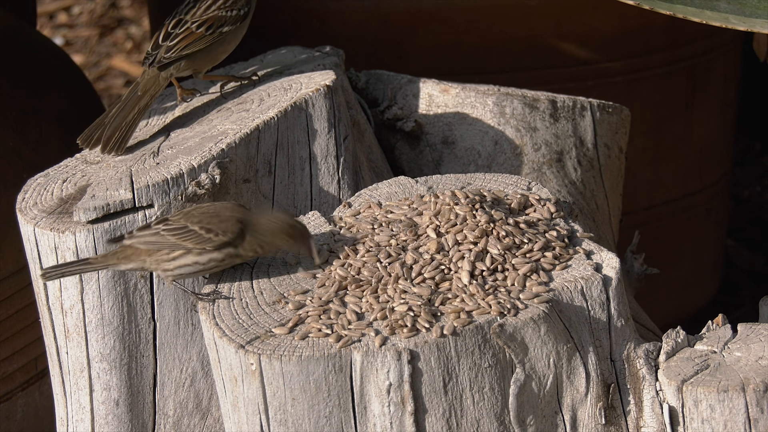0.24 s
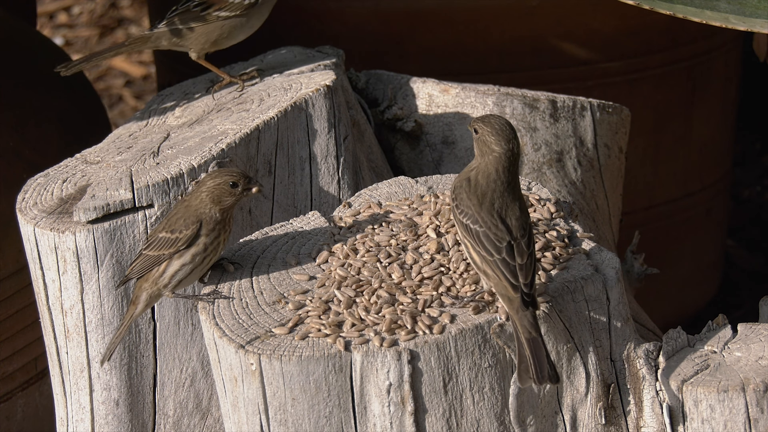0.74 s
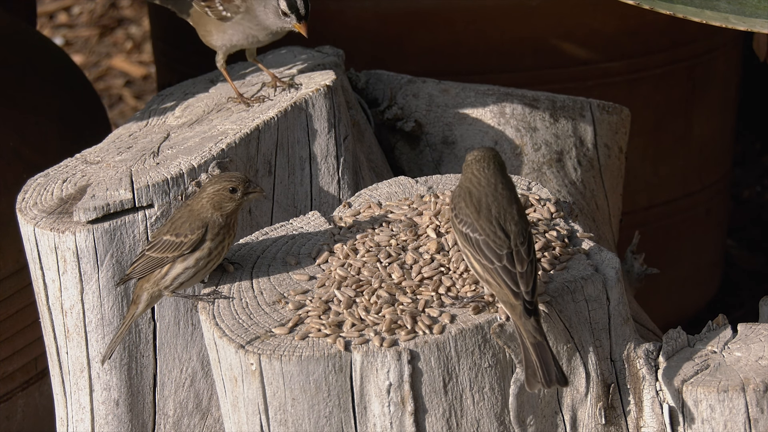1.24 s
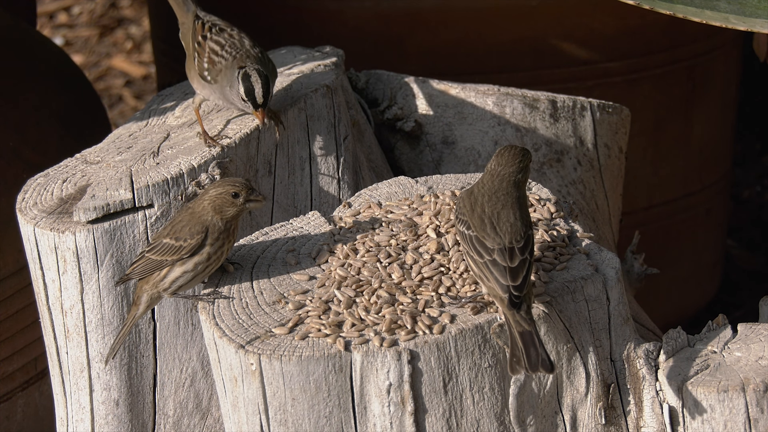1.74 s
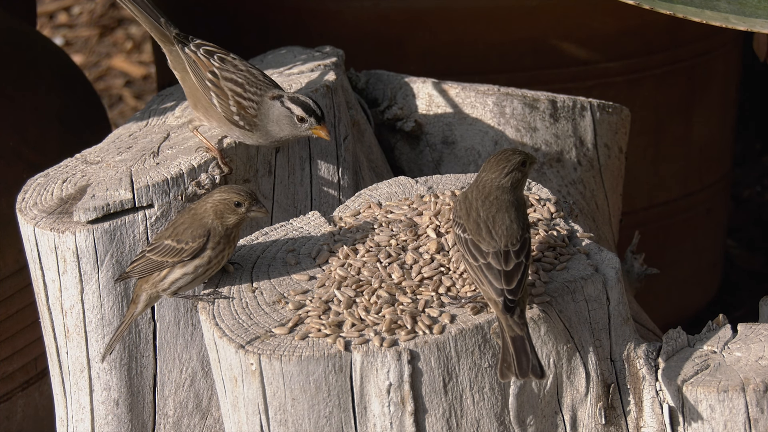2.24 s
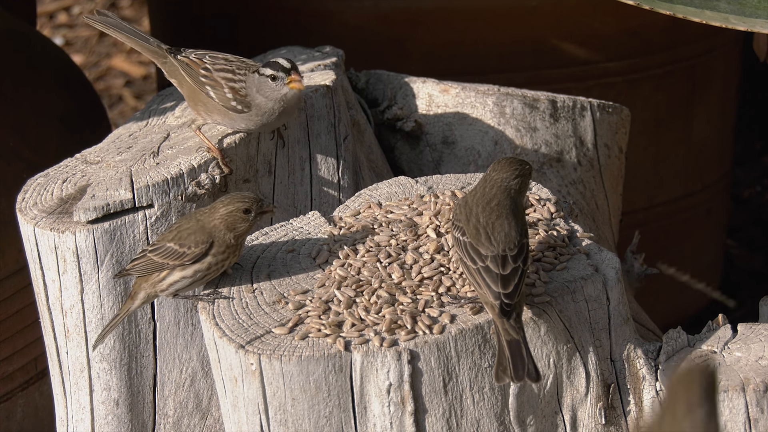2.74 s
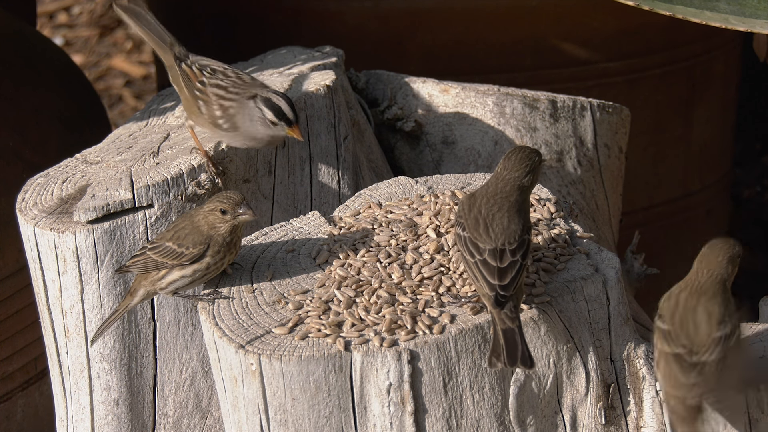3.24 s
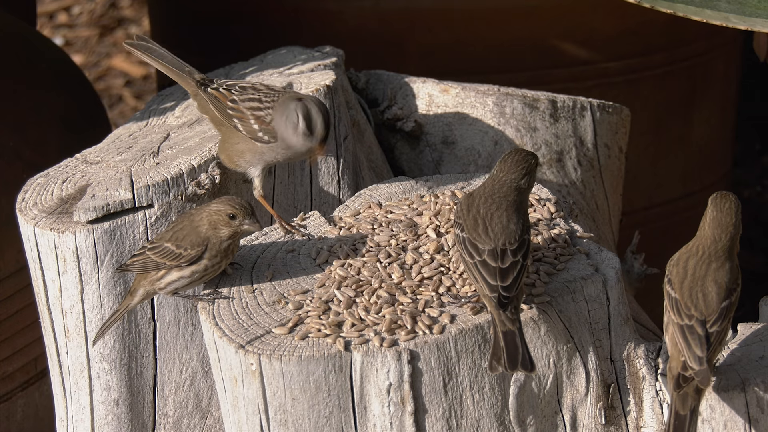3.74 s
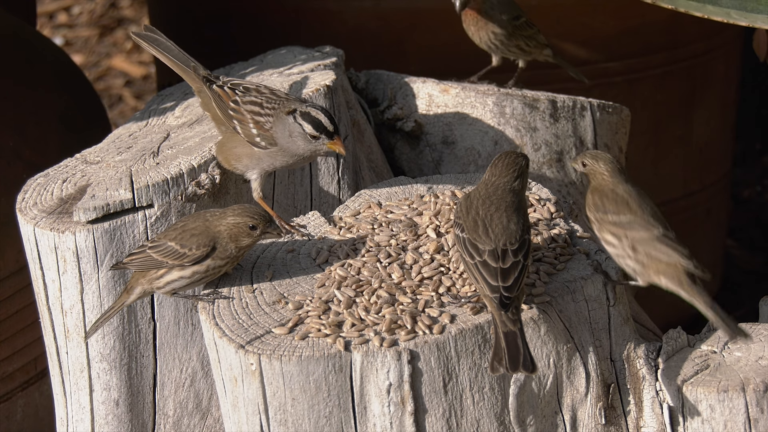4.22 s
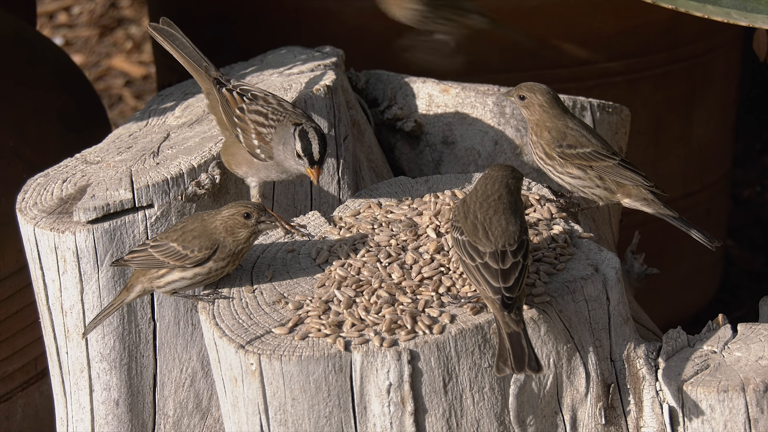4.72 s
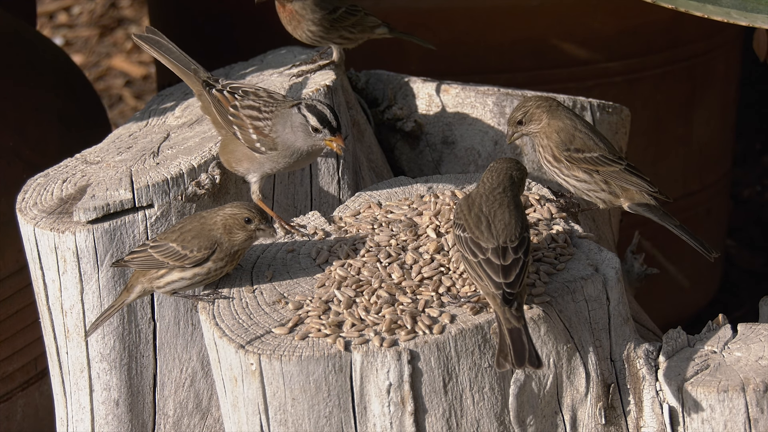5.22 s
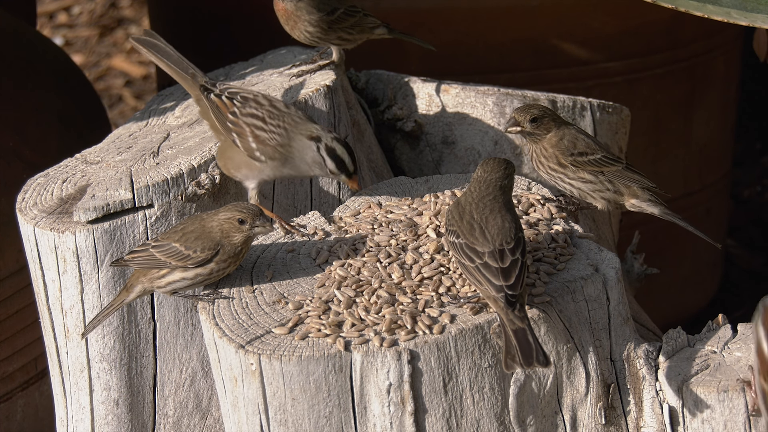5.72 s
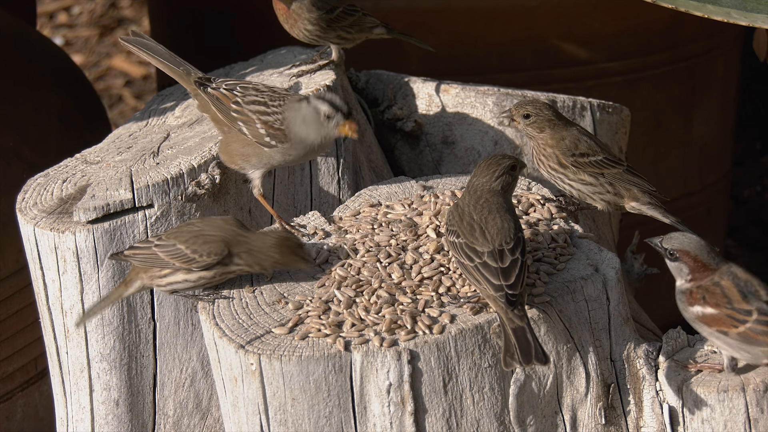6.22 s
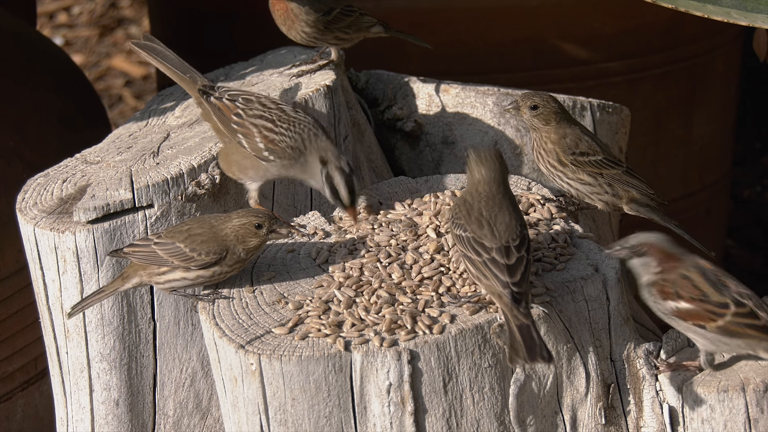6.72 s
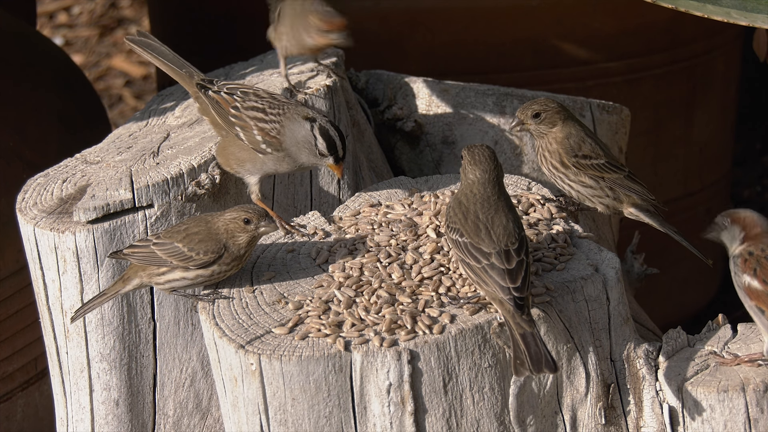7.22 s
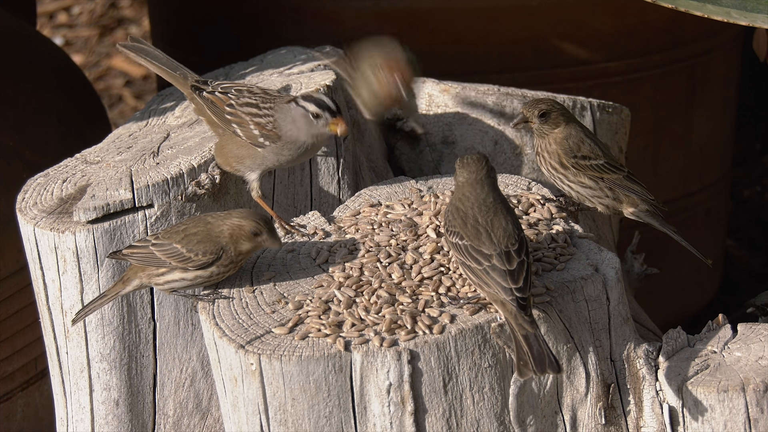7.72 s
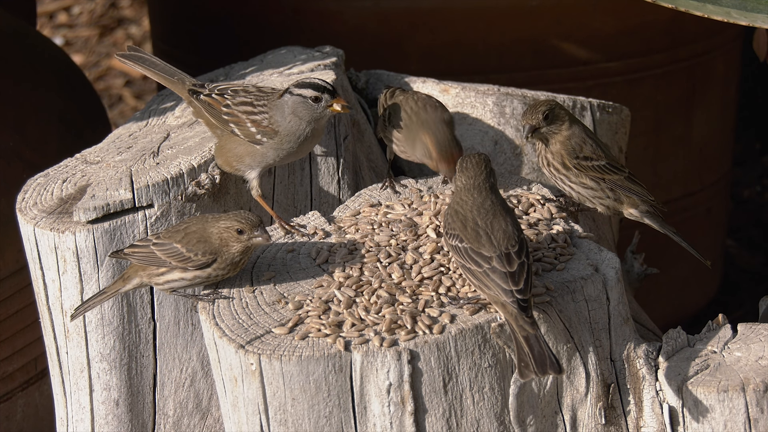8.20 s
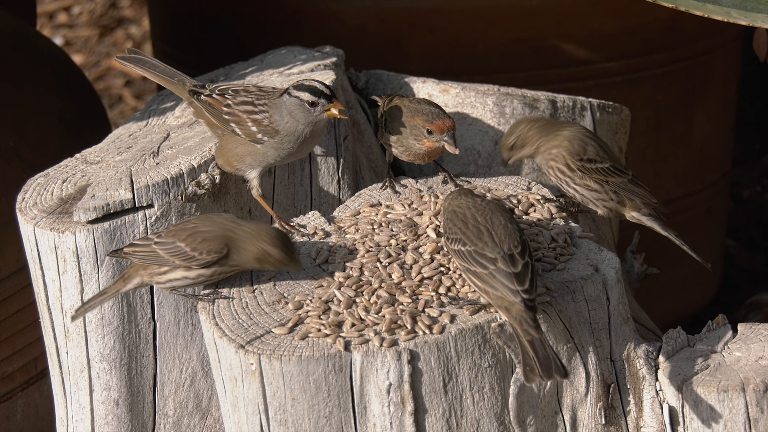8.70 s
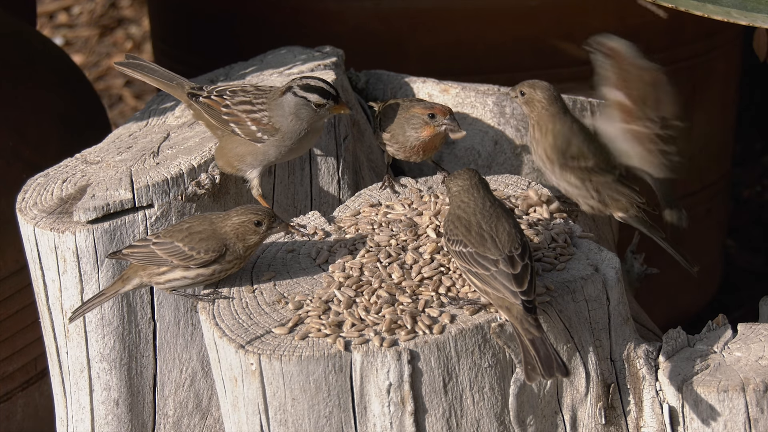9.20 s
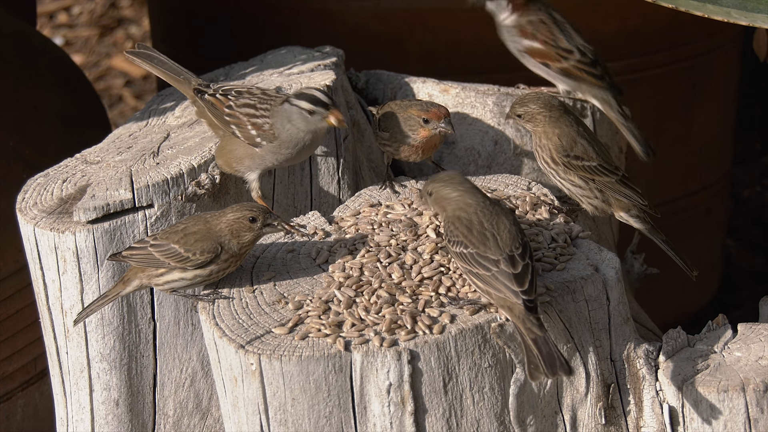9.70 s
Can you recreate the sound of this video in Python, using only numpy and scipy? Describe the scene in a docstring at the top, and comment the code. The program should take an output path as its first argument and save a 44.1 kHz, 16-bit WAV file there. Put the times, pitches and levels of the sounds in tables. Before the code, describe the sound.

In a quiet yard, small birds peck at seed close by, making crisp, uneven ticks and a soft rustle of husks. A quick run of clicks and bright chirps comes first, followed by several brief wing flutters. The calls thin out in the middle and grow busier toward the end, mixing near and far chirps, nasal cheeps and a thin high note. A distant flock is barely audible.

```python
"""Finches and sparrows feed on a heap of seed on a tree stump, close by, in a quiet yard.
Beaks and claws click on husks and wood, feet stir the seed, wings brush feathers and push air.
Two-voiced syrinx chirps, thin held notes and nasal cheeps, some breathy, come from near and far.
A wall throws them back; still air and a distant flock lie underneath."""
import sys
import numpy as np
from scipy import signal
from scipy.fft import rfft, irfft, next_fast_len
from scipy.io import wavfile
from scipy.ndimage import map_coordinates

SR = 44100
rng = np.random.default_rng(int(sys.argv[2]) if len(sys.argv) > 2 else 0)


def output_pcm(signal):
    """Save a mono or channel-first signal as 16-bit PCM at the path in sys.argv[1].

    Samples are clipped to [-1, 1] before scaling.
    """
    pcm = np.clip(np.atleast_2d(signal).T, -1, 1) * 32767
    wavfile.write(sys.argv[1], SR, np.round(pcm).astype(np.int16))


N = 438794
TIME_S = np.arange(N) / SR

# still air: f/Hz, level/dB
AIR_SPECTRUM = [(30, -34.5), (250, -36.5), (400, -28.5), (600, -18.5), (900, -9), (1400, -4.5), (2300, -5),
                (3200, -11.5), (5000, -11), (7000, -14.5), (11000, -11), (16000, -13.5)]
# distant flock: t/s, level/dB
FLOCK_LEVELS = [(0, -65.5), (.3, -70), (.45, -90.5), (1.2, -78.5), (3.4, -87.5), (3.7, -83.5), (5.1, -96),
                (6.6, -78.5), (8, -74), (9.95, -72.5)]
# distant flock: f/Hz, level/dB
FLOCK_SPECTRUM = [(500, -78.5), (2600, -31), (3300, 3.5), (3750, -9.5), (4250, 0.5), (4900, -26),
                  (6800, -22), (8200, -9), (9500, -23.5)]
# feet in loose seed: t/s, length/s, level/dB
SEED_SHUFFLES = [(0.257, 0.074, -64.5), (0.432, .15, -64), (.88, 0.13, -58), (1.123, 0.26, -76),
                 (1.54, 0.13, -67), (1.738, .08, -64.5), (2.032, 0.28, -73), (2.369, 0.15, -68),
                 (2.585, 0.42, -66.5), (3.076, 0.28, -63), (3.421, .11, -64), (3.882, 0.061, -63),
                 (4.221, 0.19, -70.5), (5.035, 0.044, -71), (5.175, .1, -69), (5.584, .1, -59.5),
                 (5.86, 0.22, -63.5), (6.258, .06, -69.5), (6.518, .23, -68.5), (6.952, 0.077, -74),
                 (7.454, 0.26, -76), (7.974, 0.058, -76), (8.544, 0.047, -58), (8.679, 0.24, -73),
                 (9.47, 0.11, -52.5), (9.71, 0.32, -72)]
# rubbing husks: f/Hz, level/dB
HUSK_SPECTRUM = [(200, -67), (1500, -21.5), (3000, -11), (5000, 0), (8000, 4.5), (10500, -5), (13000, -6),
                 (16000, -13)]
# short hissy bursts: wing flutters, and the breathy rasp around three cheeps (1.598, 3.308, 9.108 s):
# peak t/s, half length/s, hiss level/dB, puff level/dB
HISS_BURSTS = [(0.497, 0.043, -54.5, -75.5), (1.598, 0.046, -49, -87), (2.143, 0.042, -51.5, -76),
               (2.427, 0.06, -58.5, -76.5), (2.711, 0.07, -39, -55), (2.982, 0.041, -45.5, -63.5),
               (3.15, 0.06, -47.5, -63.5), (3.308, 0.024, -44.5, -84), (5.251, 0.044, -54, -64.5),
               (5.437, 0.031, -49, -67), (5.499, 0.025, -42, -52), (5.619, 0.039, -54.5, -71),
               (8.193, 0.048, -57.5, -70), (9.108, 0.046, -41.5, -76)]
# hiss of feathers or breathy rasp: f/Hz, level/dB
HISS_SPECTRUM = [(150, -74), (900, -34.5), (1700, -30.5), (3200, 3), (5000, 4), (8200, 5.5), (10500, -0.5),
                 (16000, -15.5)]
# puff of air under the hiss: f/Hz, level/dB
PUFF_SPECTRUM = [(160, -41), (280, -22.5), (400, -24.5), (560, -10.5), (800, -9), (1200, -4), (1750, 9),
                 (2600, 8.5), (5000, -16.5)]
# beak and claw clicks: t/s, level/dB, centre f/Hz, decay scale/s, relative crackle level/dB
PECK_CLICKS = [(.497, -44.5, 7300, 0.0063, -3), (0.5573, -42.5, 7100, 0.013, -9),
               (0.7702, -21, 4250, .0041, -23.5), (.7958, -30, 6000, 0.0033, -20),
               (.82, -25.5, 4660, 0.0021, -22), (.8307, -28.5, 5200, 0.001, -25),
               (.8637, -39, 5600, .0014, -27), (.8741, -24, 5320, 0.0014, -32),
               (0.9074, -26.5, 7700, 0.0023, -8), (.921, -35, 5900, 0.000486, -10.5),
               (0.9527, -32.5, 6570, 0.0012, -14.5), (1.5518, -42, 5800, .0006, -25),
               (1.5639, -36, 5700, 0.007, -3), (1.58, -40.5, 7600, 0.0067, -6),
               (1.595, -44, 7800, 0.0035, 3), (1.6525, -39, 7260, 0.0027, -14),
               (1.7708, -49, 7970, 0.0074, -17), (2.1151, -36, 7000, .0022, -5),
               (2.1313, -42, 5030, .0055, -8), (2.1635, -37.5, 6200, 0.0022, -3.5),
               (2.3952, -50, 6500, .0038, -10), (2.5852, -45, 7700, 0.0058, -10),
               (2.6258, -41, 6700, .0026, -22), (2.713, -39, 6600, .0015, -24),
               (2.7923, -39, 7400, 0.0054, -12), (3.133, -41, 5340, 0.0082, -20),
               (3.4293, -46.5, 7430, 0.0062, -29), (3.4906, -43.5, 7030, 0.004, -18),
               (3.61, -31, 5800, 0.0012, -10), (3.6476, -35, 6100, 0.0028, -16),
               (3.906, -47.5, 10100, .001, 1), (3.9192, -50, 9350, 0.0056, 2),
               (4.2122, -37, 8130, .0022, -3), (4.2135, -44, 3920, 0.0051, -13),
               (4.289, -42, 9310, 0.0013, -8), (4.4181, -36, 11100, 0.00064, -4),
               (4.461, -38.5, 7600, 0.0035, -4.5), (4.4483, -41.5, 7860, 0.00078, -8),
               (4.5725, -56.5, 6000, 0.0043, -21), (5.1707, -30.5, 6570, 0.00081, -12),
               (5.4328, -40.5, 6500, 0.0032, -4), (5.7062, -48, 8850, 0.0055, -5),
               (5.9509, -53.5, 6400, 0.0051, -27), (6.255, -31, 6530, 0.00043, -21),
               (6.2584, -32.5, 6180, 0.001, -14), (6.544, -45, 4960, 0.011, -11),
               (6.721, -51.5, 6230, 0.011, -11), (6.9601, -38, 5450, 0.0092, -12),
               (6.972, -33.5, 6230, 0.00023, -32), (7.0117, -48, 6200, 0.014, -10),
               (7.1864, -36.5, 7630, 0.00072, -22), (7.5844, -50.5, 10400, 0.0039, 0),
               (7.634, -39.5, 5370, 0.0033, -18), (7.6886, -29.5, 7900, 0.0046, -11.5),
               (7.688, -39.5, 7700, .0008, -18), (7.704, -37, 6860, 0.00043, -6),
               (7.8502, -33.5, 6330, 0.0011, -37), (8.264, -40, 9360, 0.0044, -4),
               (8.632, -52, 6570, .012, 4.5), (8.9554, -44, 6360, 0.0022, -9),
               (9.0585, -36, 7600, 0.00014, -37), (9.0716, -33.5, 6000, 0.00033, -28),
               (9.1815, -39.5, 5050, 0.0013, -17), (9.2719, -38.5, 8200, 0.0002, -20),
               (9.294, -42.5, 7900, 0.001, -22), (9.3436, -33.5, 8430, 0.00022, -13),
               (9.354, -41.5, 5700, 0.0058, 2), (9.5378, -38.5, 9200, 0.015, -10),
               (9.835, -40, 5620, 0.0018, -12), (9.9055, -52.5, 7320, 0.0049, 0)]
# finch chirps on a pitch arch; with crest delay <= 0 they only fall:
# t/s, length/s, crest f/Hz, crest delay/s, relative second voice level/dB, level/dB
FINCH_CHIRPS = [(.515, 0.014, 3650, .014, -16, -50), (.777, .058, 3830, 0.014, 2, -30.5),
                (1.026, .059, 3756, 0.023, 0, -25.5), (1.329, 0.044, 3936, 0.017, -2, -35),
                (1.415, 0.051, 3490, 0.02, -10.5, -52), (1.555, 0.042, 3910, 0.02, -3, -39.5),
                (1.857, 0.039, 4310, -0.012, -6.5, -60.5), (1.907, 0.041, 4300, -.01, -5, -62.5),
                (2.206, 0.056, 3490, 0.024, -9, -46.5), (2.951, 0.051, 3214, 0.029, -2.5, -38),
                (3.154, 0.062, 3647, 0.028, 6, -31), (3.793, 0.042, 2926, -0.0014, -22.5, -59.5),
                (3.977, 0.047, 3245, -.007, -33.5, -47), (4.746, 0.061, 3020, 0.015, -25, -51.5),
                (4.782, 0.021, 4360, -.01, -15, -63), (4.918, 0.054, 3490, 0.0036, -28.5, -39),
                (6.122, 0.063, 3766, 0.021, -14.5, -49), (7.008, 0.044, 4110, -0.013, 3.5, -52),
                (7.188, 0.056, 3700, .007, -3, -49), (7.251, 0.049, 4177, 0.011, -1.5, -37.5),
                (7.415, 0.053, 3880, 0.0036, 0, -43.5), (7.694, 0.048, 4150, 0.016, -3, -38.5),
                (7.844, 0.036, 3980, -0.013, -1, -51.5), (7.965, 0.059, 3227, .025, -8.5, -40.5),
                (7.997, 0.034, 4300, 0.0022, 0.5, -35.5), (8.198, 0.05, 3660, 0.014, -4, -53.5),
                (8.343, 0.049, 2910, 0.0065, 6, -50.5), (8.381, 0.032, 4190, 0.0063, -9.5, -37),
                (8.436, 0.031, 4030, -0.011, -10, -53), (8.572, 0.039, 4146, 0.0067, -0.5, -30),
                (8.716, 0.031, 3815, -0.0085, -3, -51), (8.875, 0.069, 3565, 0.027, 3, -42.5),
                (9.463, 0.054, 4120, -0.012, 1.5, -46), (9.5, 0.064, 3468, 0.029, 9, -43.5)]
# thin held notes of other birds; columns as FINCH_CHIRPS
THIN_CALLS = [(.751, 0.061, 7160, 0.029, -13, -40), (4.948, 0.064, 3840, 0.033, -29.5, -59),
              (5.182, 0.035, 7150, 0.0026, -19, -45.5), (6.089, 0.04, 5110, 0.021, -20.5, -59),
              (6.211, .063, 7080, 0.035, -8, -65), (9.601, 0.07, 7140, .036, 0, -34)]
# landings and push-offs: t/s, f/Hz, level/dB, rise/s, decay/s
LANDING_KNOCKS = [(0.793, 2074, -45.5, 0.0013, 0.012), (3.647, 2376, -54.5, 0.0011, 0.0073),
                  (5.474, 1760, -46, 0.0053, 0.028), (7.222, 1892, -66.5, 0.0027, 0.013),
                  (9.355, 1610, -57.5, 0.0018, 0.0051), (9.353, 2345, -53.5, 0.00058, 0.0093)]
# nasal cheeps: t/s, length/s, nominal pitch f/Hz, level/dB
NASAL_CHEEPS = [(1.629, 0.065, 874, -46.5), (2.008, 0.095, 863, -45.5), (3.241, 0.066, 879, -39.5),
                (6.551, 0.065, 872, -43.5), (8.868, 0.087, 869, -55.5), (9.096, 0.064, 885, -36.5),
                (9.498, 0.073, 847, -42.5)]
# throat resonances of a cheep: f/Hz, width/Hz, level/dB
THROAT_RESONANCES = [(2970, 1730, 3.5), (4480, 170, 6), (8000, 740, -8.5), (11200, 1000, -38)]

WALL_DELAY_S = 0.022


def from_db(db):
    return 10 ** (np.asarray(db) / 20)


def unit_rms(x):
    return x / np.sqrt(np.mean(x ** 2) + 1e-20)


def add(out, start_s, sound):
    """Mix sound into out from start_s on."""
    at = max(0, round(start_s * SR))
    out[..., at:at + sound.shape[-1]] += sound[..., :max(0, N - at)]


def colour(x, spectrum):
    """Shape noise to a spectrum; rms 1."""
    hz, db = np.transpose(spectrum)
    size = next_fast_len(N)
    bins_hz = np.maximum(np.fft.rfftfreq(size, 1 / SR), 1)
    gain = from_db(np.interp(np.log(bins_hz), np.log(hz), db))
    return unit_rms(irfft(rfft(x, size) * gain, size)[..., :N])


def band(x, low_hz, high_hz, order=2):
    edges_hz = [np.clip(low_hz, 20, .4 * SR), np.clip(high_hz, 40, .45 * SR)]
    return signal.sosfilt(signal.butter(order, edges_hz, "band", fs=SR, output="sos"), x)


def wander(t, per_s):
    """Smooth random curve, spread about 1."""
    return map_coordinates(rng.standard_normal(4096), [t * per_s], order=3, mode="wrap")


def widen(mid, side, side_db):
    return mid + from_db(side_db) * side * np.array([[1], [-1]])


def swell(progress, edge_share):
    """Smooth fade in and out, each over edge_share of a note."""
    return np.sin(np.pi / 2 * np.clip(np.minimum(progress, 1 - progress) / edge_share, 0, 1)) ** 2


def still_air(level_db=-77.5):
    """Steady faint outdoor hiss."""
    return from_db(level_db) * widen(*colour(rng.standard_normal((2, N)), AIR_SPECTRUM), side_db=-2.5)


def distant_flock(flicker_db=2.1):
    """Far chatter, blurred to a flickering band of noise."""
    level_db = np.interp(TIME_S, *np.transpose(FLOCK_LEVELS)) + flicker_db * wander(TIME_S, 26)
    chatter = from_db(level_db) * colour(rng.standard_normal((2, N)), FLOCK_SPECTRUM)
    return widen(*chatter, side_db=3.5)


def stirring(rest_db=-80.5, attack_s=0.015, release_s=0.066):
    """Seed motion envelope: each shuffle sets in, holds, and the heap settles."""
    out, t = np.full(N, from_db(rest_db)), np.arange(SR) / SR
    for start_s, length_s, db in SEED_SHUFFLES:
        settling = np.exp(-np.maximum(t - length_s, 0) / release_s)
        add(out, start_s, from_db(db) * np.minimum(t / attack_s, 1) * settling)
    return out


def seed_rustle(grains_per_s=700, grain_s=.001, spread_db=0.5, bed_db=-2, clump_db=6, patch_db=4.5):
    """Tiny husk grains over a fine hiss, in clumps as feet shift; each clump has its own colour."""
    sizes = from_db(spread_db * np.minimum(rng.exponential(1, N), 4))
    impacts = sizes * (rng.random(N) < grains_per_s / SR)
    grains = unit_rms(signal.lfilter([1], [1, -np.exp(-1 / (grain_s * SR))], impacts + 1e-18))
    clumps = from_db(clump_db * np.clip(wander(TIME_S, 70), -2, 2))
    rubbing = rng.standard_normal((2, 2, N)) * (grains + from_db(bed_db)) * clumps
    edges_hz, patches = np.linspace(200, 17000, 15), np.zeros((2, N))
    for k, (low_hz, high_hz) in enumerate(zip(edges_hz, edges_hz[1:])):
        gain = np.repeat(from_db(patch_db * wander(TIME_S[::64], 45)), 64)[:N]
        patches += band(rubbing[k % 2], low_hz, high_hz) * gain
    return widen(*colour(patches, HUSK_SPECTRUM), side_db=-2.5) * stirring()


def flutters_and_rasps(pulses_per_s=26, depth_db=3.5, steepness=2.17, grain_db=2, puff_spread_db=4):
    """Pulsing hiss over uneven puffs: wings brush feathers and push air, or a cheep rasps breathily."""
    hiss, puff = np.zeros(N), np.zeros(N)
    t = np.arange(-SR // 4, SR // 4) / SR
    pulses = from_db(depth_db * (np.cos(2 * np.pi * pulses_per_s * t) - .5))
    for peak_s, half_s, hiss_db, puff_db in HISS_BURSTS:
        envelope = pulses * .5 ** (np.abs(t / half_s) ** steepness)
        add(hiss, peak_s + t[0], from_db(hiss_db) * envelope)
        add(puff, peak_s + t[0], from_db(puff_db) * envelope)
    grainy = rng.standard_normal((2, N)) * from_db(grain_db * wander(TIME_S, 700))
    gusty = rng.standard_normal((2, N)) * from_db(puff_spread_db * wander(TIME_S, 160))
    mid, side = hiss * colour(grainy, HISS_SPECTRUM) + puff * colour(gusty, PUFF_SPECTRUM)
    side = side - 2 * np.diff(side, 2, prepend=0, append=0)   # wider in the treble
    return widen(mid, side, side_db=-14)


def click(db, hz, decay_s, crackle_db, width_oct, rattle_db=-11, settle_db=-25, settle_s=0.017):
    """A hard snap, the husk rattles, its neighbours settle. Too small to radiate bass."""
    t = np.arange(3000) / SR
    rattle = from_db(rattle_db) * np.exp(-t / (2 * decay_s))
    # a brief contact disturbs fewer seeds
    settling = from_db(settle_db) * np.sqrt(decay_s / settle_s) * np.exp(-t / settle_s)
    envelope = np.exp(-t / (.55 * decay_s)) + rattle + settling
    force = envelope * rng.standard_normal(len(t))
    force[3] += 1.96   # the strike
    body = unit_rms(band(force, hz * 2 ** (-width_oct / 2), hz * 2 ** (width_oct / 2)))
    skirt = from_db(-16) * width_oct * unit_rms(band(force, 4300, 6500))
    snap = unit_rms(band(body + skirt, 2000, 10500, order=5))
    crackle = unit_rms(band(envelope * rng.standard_normal((2, len(t))), 10500, 14000, order=3))
    sound = snap + crackle * from_db([[crackle_db - 1.5], [crackle_db + 1.5]])
    return from_db(db) * sound / np.sqrt(np.mean(sound[:, :220] ** 2))   # db: rms of the first 5 ms


def husk_ticks(ticks_per_s=5, centre_hz=6930, spread_oct=.25):
    """Shuffles flick husks at random moments; longer ones flick more."""
    out = np.zeros((2, N))
    for start_s, length_s, _ in SEED_SHUFFLES:
        for _ in range(round(ticks_per_s * length_s)):
            hz = centre_hz * 2 ** (spread_oct * rng.standard_normal())
            tick = click(db=-54.5, hz=hz, decay_s=.003, crackle_db=-12.5, width_oct=0.36)
            add(out, start_s + length_s * rng.random(), tick)
    return out


def pecks(widest_oct=0.82, half_width_at_hz=9500):
    """Beaks and claws strike husks and wood; the higher a click, the clearer its pitch."""
    out = np.zeros((2, N))
    for start_s, db, hz, decay_s, crackle_db in PECK_CLICKS:
        width_oct = widest_oct / (1 + (hz / half_width_at_hz) ** 4)
        add(out, start_s, click(db, hz, decay_s, crackle_db, width_oct))
    return out


def chirps(calls, slope_hz_per_s, echo_db, rounding_s=0.014, voice_gap_hz=537, near_db=-34.5):
    """Each side of the syrinx whistles an arch; products add upper bands. Returns direct, echo feed."""
    direct, feed = np.zeros(N), np.zeros(N)
    for start_s, length_s, crest_hz, crest_s, second_db, db in calls:
        lead_s = length_s / 10
        t = np.arange(int((length_s + 2 * lead_s) * SR)) / SR
        from_crest_s = np.minimum(t - lead_s, 0.71 * length_s) - crest_s   # the glide ends held
        arch_hz = crest_hz - slope_hz_per_s * (np.hypot(from_crest_s, rounding_s) - rounding_s)
        lower_hz = arch_hz * (1 + 0.01 * wander(t, 250))
        upper_hz = lower_hz + voice_gap_hz * (1 + 0.018 * wander(t, 100))
        lower, upper = np.exp(2j * np.pi * np.cumsum([lower_hz, upper_hz], axis=1) / SR)
        rasp = 1 + .08 * (wander(t, 1800) + 1j * wander(t, 1800))   # uneven membrane flutter
        voices = (lower + from_db(second_db) * upper) * rasp
        overtones = from_db(-17) * band((voices ** 2).real, 6600, 8800, order=1)
        overtones += from_db(-40) * (voices ** 3).real
        fainter_db = near_db - db
        tone = voices.real + from_db(-0.13 * max(fainter_db, 0)) * overtones   # soft notes are purer
        shimmer_db = 4 * wander(t, 160)
        note = tone * swell(t / t[-1], 0.43) * from_db(db + 1 + shimmer_db)
        add(direct, start_s - lead_s, note)
        # fainter birds are further off: larger share of echo
        add(feed, start_s - lead_s, note * from_db(echo_db + 0.52 * fainter_db))
    return np.array([direct, feed])


def knocks(width_hz=170):
    """Birds land and push off: a dull, narrow ring that dies quickly."""
    out, t = np.zeros(N), np.arange(9000) / SR
    for start_s, hz, db, rise_s, decay_s in LANDING_KNOCKS:
        ring = band(rng.standard_normal(2 * len(t)), hz - width_hz / 2, hz + width_hz / 2)[len(t):]
        envelope = 2 * (1 - np.exp(-t / rise_s)) * np.exp(-t / decay_s)
        add(out, start_s, from_db(db) * unit_rms(ring) * envelope)
    return out


def cheeps(scoop_share=.31, scoop_s=.034, sag_share=0.027):
    """A low, rough note scoops up to pitch; its harmonics slide into the throat resonances."""
    out, harmonics = np.zeros(N), np.arange(4, 17)[:, None]
    for start_s, length_s, pitch_hz, db in NASAL_CHEEPS:
        t = np.arange(int(length_s * SR)) / SR
        scoop = scoop_share * np.maximum(1 - t / scoop_s, 0) ** 1.5
        sag = sag_share * (t / length_s) ** 2
        hz = pitch_hz * (1 - scoop - sag) * (1 + 0.014 * wander(t, 400))
        gains = sum(from_db(peak_db) / (1 + (2 * (harmonics * hz - peak_hz) / width_hz) ** 2)
                    for peak_hz, width_hz, peak_db in THROAT_RESONANCES)
        phases = 2 * np.pi * harmonics * np.cumsum(hz) / SR + rng.uniform(0, 2 * np.pi, harmonics.shape)
        note = np.sum(gains * np.sin(phases), axis=0)
        rasp = 1 + .16 * wander(t, 900)
        add(out, start_s, from_db(db) * note * rasp * swell(t / length_s, 0.4))
    return out


def yard_echo(x, near_db=-3, near_s=0.0066, wall_db=-5, scatter_db=-3, t60_s=0.18):
    """Quick bounces off stump and ground, one wall echo, stereo scatter from fence and shrubs."""
    t = np.arange(SR // 2) / SR
    near = band(rng.standard_normal(len(t)), 660, 9000, order=1) * np.exp(-t / near_s) * (t > .002)
    tail = from_db(-60 * t / t60_s) * (1 - np.exp(-t / 0.028))
    scatter = band(rng.standard_normal((2, len(t))), 720, 6100, order=1) * tail
    response = from_db(scatter_db) * widen(*scatter, side_db=-6.5) / np.linalg.norm(scatter[0])
    response += from_db(near_db) * near / np.linalg.norm(near)
    response[:, round(WALL_DELAY_S * SR)] += from_db(wall_db)
    return signal.fftconvolve(x[None], response, axes=1)[:, :N]


def scene():
    """Feeding, calls and yard echo over still air and the far flock."""
    bed = seed_rustle() + still_air() + distant_flock()
    finches = chirps(FINCH_CHIRPS, slope_hz_per_s=34000, echo_db=-18)
    thin_calls = chirps(THIN_CALLS, slope_hz_per_s=20000, echo_db=-8.5)
    chirp, chirp_feed = finches + thin_calls
    cheep = cheeps()
    stump = pecks() + flutters_and_rasps() + knocks() + husk_ticks()
    chirp_feed = band(chirp_feed, 3000, 9200, order=4)   # leaves and twigs return few low notes
    echoes = yard_echo(chirp_feed + from_db(-3) * cheep + from_db(-20) * stump.mean(axis=0))
    # the cheeping bird sits near the wall: its note comes twice
    cheep_echo = from_db(-6.5) * np.roll(cheep, round(WALL_DELAY_S * SR))
    return stump + chirp + cheep + cheep_echo + echoes + bed


def record(dry, port_hz=12600, port_width_hz=2200, cutoff_hz=16550):
    """The right microphone port turns the treble's phase; both sides are low-passed."""
    radius = np.exp(-np.pi * port_width_hz / SR)
    poles = np.array([1, -2 * radius * np.cos(2 * np.pi * port_hz / SR), radius ** 2])
    heard = np.array([dry[0], signal.lfilter(poles[::-1], poles, dry[1])])
    return signal.sosfilt(signal.ellip(10, .2, 80, cutoff_hz, fs=SR, output="sos"), heard)


dry = scene()
out = record(dry)
output_pcm(out)
```